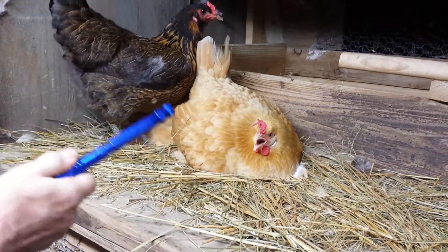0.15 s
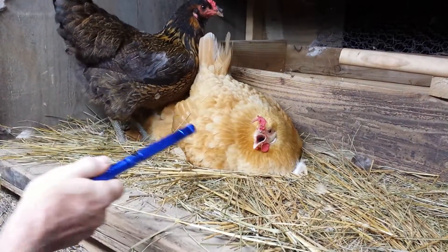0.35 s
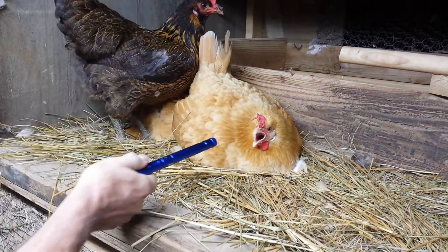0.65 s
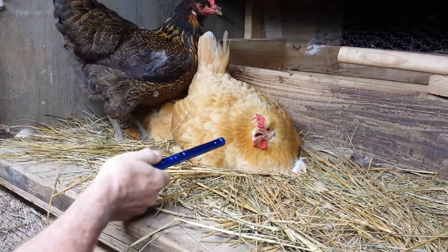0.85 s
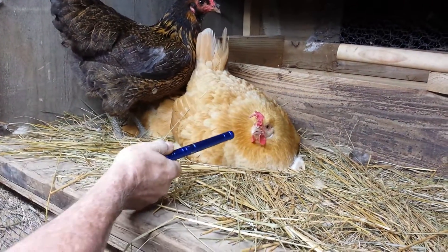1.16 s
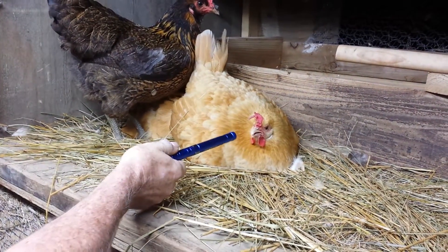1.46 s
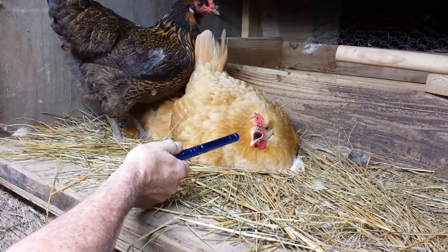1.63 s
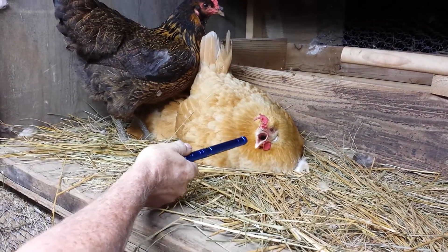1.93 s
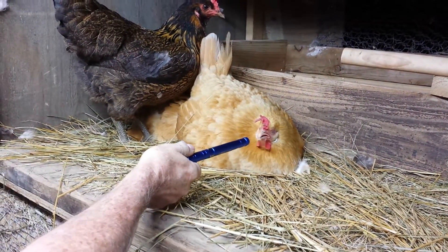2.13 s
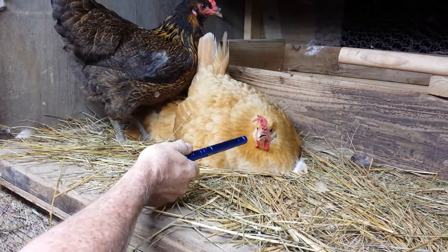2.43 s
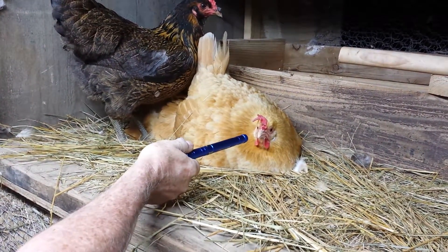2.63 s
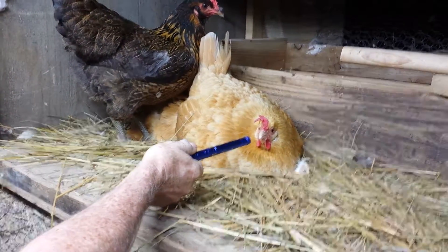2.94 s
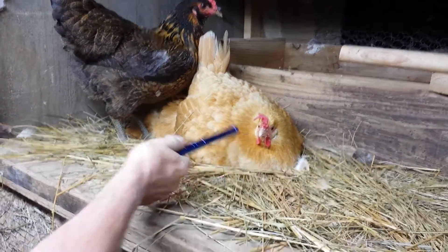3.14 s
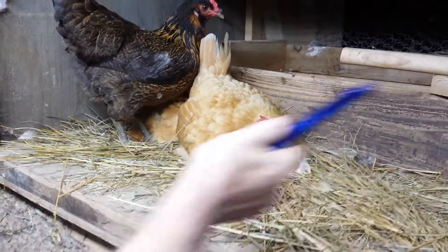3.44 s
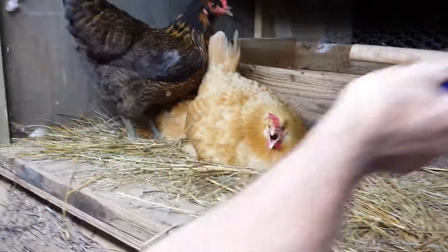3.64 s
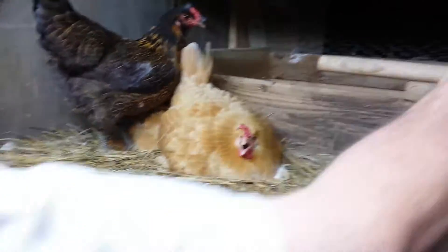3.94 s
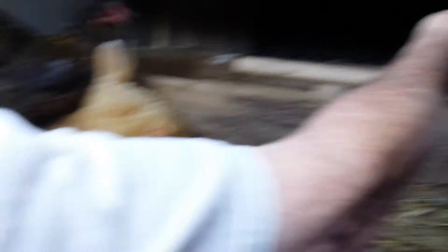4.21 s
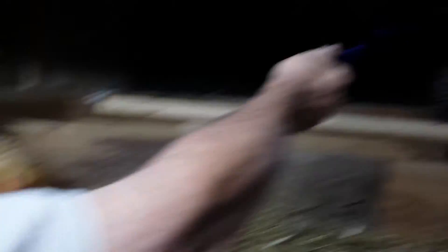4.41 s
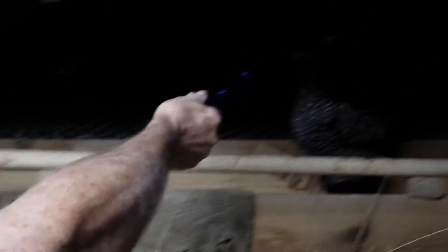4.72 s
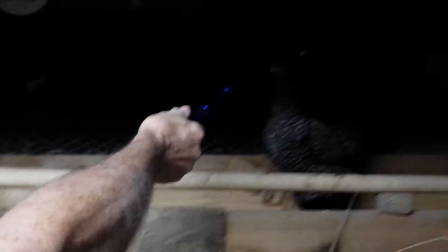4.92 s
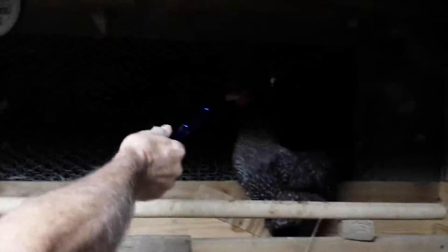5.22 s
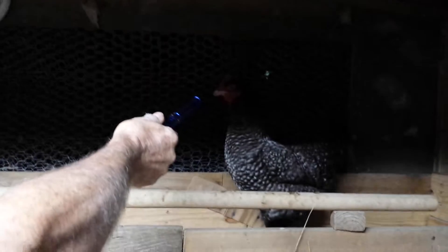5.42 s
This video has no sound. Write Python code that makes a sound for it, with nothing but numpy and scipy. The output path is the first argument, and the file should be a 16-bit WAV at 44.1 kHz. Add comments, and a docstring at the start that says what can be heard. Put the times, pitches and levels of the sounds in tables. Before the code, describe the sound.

A handheld stereo microphone is close to hens in a wooden nest box, with a brief dull board echo, faint hiss and low hum. The sound opens mid-screech: a loud, high, wavering whistle breaks at about 0.13 s into a harsh throbbing growl. More broken shrieks follow at 0.3-0.5 and 0.6-0.75 s, each falling into growls, with stuttering rasps until about 1.05 s. Soft low clucks from another hen continue about four a second, exposed in the gap. From 1.6 s a screech swells, clears and peaks near 1.9 s, dropping at 2.07 s into a rough squawk and hoarse croak, with broken remnants to 2.55 s. Mostly clucks remain until faint stutters at 3.35-3.6 s. Screeches return at 3.6-3.9 s, then a growl, and a sharp shriek at 4.06-4.25 s. A different hen then gives a long, lower, rasping, wavering complaint to the abrupt end at 5.57 s, amid stronger clucks and slightly louder background air.

```python
"""Hens protesting in a nest box

One hen in a wooden nest box screeches in a high whistling register, drops into a harsh growl and stutters;
her screech is a few wavering tones, her growls and squawk are rough pulses coloured by a throat.
A second hen makes a long drawn-out complaint and a third clucks about four times a second, with the same
kind of pulses. The boards of the coop add a short tail of filtered noise over faint hiss and a low hum."""
import sys
import numpy as np
from scipy import signal
from scipy.fft import rfft, irfft, next_fast_len
from scipy.io import wavfile
from scipy.ndimage import uniform_filter1d

SR = 44100
rng = np.random.default_rng(int(sys.argv[2]) if len(sys.argv) > 2 else 0)


def output_pcm(signal):
    """Save a mono or channel-first signal as 16-bit PCM at the path in sys.argv[1].

    Samples are clipped to [-1, 1] before scaling.
    """
    pcm = np.clip(np.atleast_2d(signal).T, -1, 1) * 32767
    wavfile.write(sys.argv[1], SR, np.round(pcm).astype(np.int16))


def undo_db(level):
    """Turn decibels back into plain size, where 20 dB means ten times bigger."""
    steps = np.asarray(level, float) / 20
    return 10 ** steps


N = 245637
TIME = np.arange(N) / SR

# The throat behind growls, short bursts and croak. Each row: frequency in Hz, relative strength in dB.
GROWL_THROAT = [(400, -29), (720, -10.5), (940, -2), (1250, -1), (1500, -10.5), (1900, -11), (2800, -14),
                (3800, -12.5), (4700, -17), (5700, -11.5), (6500, -22), (7500, -19.5), (9500, -32.5),
                (11500, -53), (14400, -52)]
# Stretches in which the vocal folds settle into a steadier beat.
# Each row: start in seconds, end in seconds, roughness from 0 to 1.
CLEAR_STRETCHES = [(2.15, 2.3, .07), (4.35, 4.42, .2), (4.79, 4.87, .24), (4.92, 5.075, .13),
                   (5.18, 5.235, .14), (5.285, 5.385, .2)]


def level(x, db):
    """Scale a sound to an average (rms) level in dB."""
    return x * undo_db(db) / np.sqrt(np.mean(x ** 2) + 1e-18)


def along(table, hz):
    """Read a table of (Hz, value) rows between its points, on a log-frequency axis."""
    table_hz, values = np.transpose(table)
    return np.interp(np.log(hz + 1), np.log(table_hz + 1), values)


def colour(x, table):
    """Make frequencies stronger or weaker by a table of (Hz, dB) rows."""
    count = x.shape[-1]
    size = next_fast_len(count + 2048)
    hz = np.arange(size // 2 + 1) * SR / size
    return irfft(rfft(x, size) * undo_db(along(table, hz)), size)[..., :count]


def walk(count, rate):
    """Smooth random wandering that changes about rate times a second, with spread 1."""
    k = max(int(SR / rate), 1)
    noise = rng.standard_normal(count + 2 * k)
    smooth = uniform_filter1d(uniform_filter1d(noise, k), k)[k:k + count]
    return smooth * np.sqrt(1.5 * k)  # makes up for the spread lost in smoothing


def add(out, start_s, x):
    """Mix x into out from a moment on."""
    i = int(start_s * SR)
    out[i:i + len(x)] += x[:N - i]


def spread(table):
    """Join the rows of a call sample by sample, with a short fade at both ends."""
    s, *columns = np.transpose(table)
    t = np.arange(s[0], s[-1], 1 / SR)
    since_start = t - s[0] + 0.0025 * (s[0] == 0)  # a call at time zero is already under way
    fade = np.clip(np.minimum(since_start, s[-1] - t) / 0.0053, 0, 1)
    return t, fade, [np.interp(t, s, column) for column in columns]


def air():
    """Faint hiss and rumble with a wavering low hum; the bass is alike left and right."""
    # Each row: frequency in Hz, relative noise density in dB.
    air_colour = [(15, -37.5), (25, -5.5), (97, -11.5), (137, -14.5), (170, -29.5), (240, -15.5),
                  (1040, -25.5), (2430, -34), (8470, -31.5), (9420, -38), (14400, -44)]
    # Each row: time in seconds, level in dB.
    air_level = [(0, -51.5), (1.2, -51.5), (2.5, -55), (3.3, -52.5), (3.65, -44), (5.57, -45)]
    # Each row: frequency in Hz, usual level in dB against the air level.
    hum_tones = [(88, -10), (110, -14.5)]
    mid, side = colour(rng.standard_normal((2, N)), air_colour)
    side = signal.lfilter(*signal.butter(1, 90, "high", fs=SR), side)
    hum = np.zeros(N)
    for hz, db in hum_tones:
        strength = np.sqrt(2) * undo_db(db + 3.5 * walk(N, 3.36))
        hum += strength * np.sin(2 * np.pi * hz * TIME + 2.2 * walk(N, 3.8))
    hiss = level(mid + 0.72 * side * np.array([[1], [-1]]), -3.4)
    return (hiss + hum) * undo_db(np.interp(TIME, *np.transpose(air_level)))


def screech():
    """Few strong partials that waver and slip, with half-pitch lines and a rasp between them."""
    # One list a call. Each row: time in seconds, pitch in Hz, level in dB,
    # strain in dB (half-pitch lines and rasp against the level).
    calls = [
        [(0, 1697, -14, -14), (.035, 1717, -15, -21.5), (.08, 1708, -14.5, -20.5), (.115, 1658, -13.5, -23),
         (.125, 1496, -34, 6.5), (.138, 1302, -13.5, -15.5)],
        [(.29, 1506, -22.5, -9), (.302, 1329, -31.5, 2), (.325, 1351, -22, -15.5), (.35, 1414, -33, 7.5),
         (.362, 1725, -16, -15.5), (.445, 1628, -16.5, -11.5), (.452, 1495, -22, -9.5), (.485, 1447, -22, -7.5),
         (.495, 1275, -27.5, -2), (.512, 1247, -25.5, -7)],
        [(.6, 1268, -20, -5), (.64, 1410, -24.5, -18.5), (.655, 1614, -19.5, -1), (.67, 1390, -21.5, -11),
         (.715, 1453, -18.5, -33), (.724, 1326, -21, -3), (.755, 1283, -28.5, -1.5)],
        [(1.58, 1123, -66, -10), (1.602, 1232, -37.5, -17), (1.655, 1278, -47, 10), (1.697, 1667, -27.5, -26.5),
         (1.81, 1657, -21.5, -36.5), (1.88, 1737, -16, -42.5), (1.93, 1721, -14.5, -34),
         (1.995, 1604, -20, -17.5), (2.005, 1455, -20, -9), (2.045, 1308, -26.5, -23), (2.07, 1295, -22, -7.5)],
        [(3.6, 1416, -40.5, 1), (3.65, 1500, -36, -5.5), (3.722, 1658, -25, -8), (3.745, 1544, -25, -21.5),
         (3.795, 1670, -17, -55), (3.815, 1543, -25.5, -14), (3.845, 1453, -25, -15.5),
         (3.855, 1373, -29.5, 2.5), (3.892, 1280, -18.5, -7.5)],
        [(4.06, 1319, -20.5, -41.5), (4.095, 1407, -27.5, -4.5), (4.101, 1477, -20.5, -22),
         (4.132, 1672, -11, -28.5), (4.16, 1609, -18.5, -23), (4.167, 1488, -18.5, -32.5),
         (4.19, 1470, -18, -19), (4.198, 1387, -21, -21), (4.25, 1274, -17, -19)],
    ]
    # One row a call: first partial in dB (a wider beak thins it), partials above the second in dB,
    # half-pitch lines in dB against the rasp.
    voices = [(3, 0, 3.5), (0.5, -0.5, -20), (-3.5, -1, -10.5), (-7.5, 1, -11), (-11, 0, -6),
              (-13, -8.5, -14)]
    # The half-pitch lines from the lowest up, each in dB.
    half_lines_db = [-23, -9, -20.5, -5.5, -20.5]
    # The throat that the partials move through. Each row: frequency in Hz, strength in dB.
    screech_throat = [(1200, 7.5), (1700, -9), (2600, 8.5), (3000, 2), (3400, -6.5), (4000, -3.5),
                      (5000, -7.5), (6600, -16), (8300, -22), (10000, -49.5), (13500, -47)]
    # Each row: frequency in Hz, relative strength of the rasp in dB.
    rasp_colour = [(500, -18.5), (1000, -9.5), (3000, -11), (5500, -3.5), (8500, -9), (11000, -45),
                   (14400, -41.5)]
    # Brief breaks of the pitch. Each row: time in seconds, pitch change as a share.
    slips = [(.054, -0.082), (0.095, -0.1), (.337, 0.12), (0.417, -.11), (0.459, -0.094), (1.823, -0.0022),
             (2.033, .07), (3.871, 0.053)]
    slip_s = 0.0039
    strain_waver = 1.5  # how much more the pitch wavers under full strain

    out = np.zeros(N)
    slip = sum(share * np.exp(-.5 * ((TIME - s) / slip_s) ** 2) for s, share in slips)
    for table, (first_db, upper_db, half_db) in zip(calls, voices):
        t, fade, (hz, db, strain_db) = spread(table)
        count = len(t)
        waver = .011 * walk(count, 110) + 0.0097 * walk(count, 300)
        waver = waver * (1 + strain_waver * np.minimum(undo_db(strain_db), 1))
        phase = 2 * np.pi * np.cumsum(hz * (1 + np.interp(t, TIME, slip) + waver)) / SR
        partials = []
        for k in range(1, 9):
            throat_db = along(screech_throat, k * hz)
            partials.append((k, throat_db + first_db * (k == 1) + upper_db * (k > 2)))
        for k, line_db in enumerate(half_lines_db):
            partials.append((k + .5, strain_db + half_db + line_db))
        tone = np.zeros(count)
        for k, part_db in partials:
            flicker_db = 1.34 * walk(count, 110)
            tone += np.sqrt(2) * undo_db(part_db + flicker_db) * np.sin(k * phase)
        puffs = rng.standard_normal(count) * (1 + 0.52 * np.cos(phase))
        rasp = level(colour(puffs, rasp_colour), 0) * undo_db(strain_db)
        add(out, t[0], fade * undo_db(db) * (tone + rasp))
    return out


def folds(hz, rough, throat, jitter, throb_db, breath_db):
    """Vocal-fold pulses through a throat; roughness shakes pitch and strength and lets air hiss through."""
    # Each row: frequency in Hz, relative hiss in dB; it is weakest near the usual fundamental.
    breath_colour = [(500, -3), (900, -9), (1300, -5), (2200, 0), (14000, 0)]
    count = len(hz)
    shake = 0.00405 * walk(count, 59.4) + jitter * rough * walk(count, 324)
    phase = 2 * np.pi * np.cumsum(hz * (1 + shake)) / SR
    pulses = np.zeros(count)
    for k in range(1, 41):
        # the moving beak lets every partial swell and fade on its own
        strength = undo_db(min(1.5 * k, 3) * walk(count, 20))
        pulses += strength * np.cos(k * phase + .3 * k * k) * (k * hz < 15000)
    breath = colour(rng.standard_normal(count) * (1 + .9 * np.cos(phase)), breath_colour)
    source = np.sqrt(1 - .5 * rough) * level(pulses, 0) + rough * level(breath, breath_db)
    dips_db = throb_db * rough * np.abs(walk(count, 85)) ** 1.5
    return level(colour(source, throat), 0) * undo_db(-dips_db)


def chest(x, db):
    """The lowest throat resonance opens and closes against the rest."""
    low = signal.sosfiltfilt(signal.butter(2, 1350, fs=SR, output="sos"), x)
    return x + (undo_db(db) - 1) * low


def clucks():
    """Each cluck rises to its top pitch and sags again while it swells and dies."""
    # Each row: start in seconds, strength in dB before the beak opens, top pitch in Hz, length in seconds.
    cluck_list = [(0.108, -18, 316, 0.057), (0.339, -16.5, 317.6, .055), (0.613, -18.5, 306.6, 0.046),
                  (0.855, -18, 320, 0.067), (1.076, -10, 315, 0.044), (1.296, -17, 328.7, 0.0476),
                  (1.523, -17.5, 316.4, 0.04), (1.731, -14, 329.7, 0.065), (1.949, -13.5, 335, 0.044),
                  (2.482, -14.5, 413.5, .065), (2.714, -15, 371.4, 0.049), (2.957, -18.5, 342.6, .055),
                  (3.271, -19, 304.6, 0.054), (3.589, -12.5, 329.2, 0.049), (3.799, -10.5, 314.7, 0.049),
                  (4.028, -11.5, 349.4, 0.045), (4.24, -13, 317.5, 0.071), (4.488, -9.5, 384.5, .05),
                  (4.716, -8, 390.7, 0.062), (4.957, -6.5, 344.5, 0.048), (5.21, -8.5, 377, 0.044),
                  (5.479, -12.5, 363.6, 0.054)]
    # Each row: frequency in Hz, relative strength in dB.
    cluck_throat = [(130, -36), (220, -2.5), (320, -6), (480, -23), (700, 2.5), (1050, 3.5), (1450, -13),
                    (1950, -19), (2400, -31.5), (3700, -19), (5000, -28.5), (7500, -28), (9500, -35),
                    (11000, -57), (14000, -49)]
    out = np.zeros(N)
    for s, db, hz, length in cluck_list:
        u = np.arange(int(length * SR)) / (length * SR)  # 0 to 1 through the cluck
        arch = np.interp(u, [0, .35, .55, .75, 1], [.74, .96, 1, .97, .86])
        voice = folds(hz * arch, .75 + 0 * u, cluck_throat, jitter=.05, throb_db=3, breath_db=2)
        # a harder cluck opens the beak: the fundamental falls behind
        low = signal.sosfiltfilt(signal.butter(2, 480, fs=SR, output="sos"), voice)
        voice = voice + (undo_db(-.9 * (db + 23.0)) - 1) * low
        swell = np.interp(u, [0, .1, .3, .55, .8, 1], [0, .35, .7, 1, .5, 0])
        add(out, s, undo_db(db) * swell * voice)
    return out


def low_voice(tables, throat, harsh, clear, throb_db, chest_db):
    """Growls, croak, squawk and complaint share one mechanism: harsh, but for their clear stretches."""
    settle_s = .025
    out = np.zeros(N)
    for table in tables:
        t, fade, (hz, db) = spread(table)
        rough = np.full(len(t), float(harsh))
        for start, end, clear_rough in clear:
            settled = np.clip(np.minimum(t - start, end - t) / settle_s + 1, 0, 1)
            rough -= (harsh - clear_rough) * settled
        rough = np.clip(rough, .03, 1)
        voice = folds(hz, rough, throat, jitter=.048, throb_db=throb_db, breath_db=2)
        add(out, t[0], fade * undo_db(db) * chest(voice, chest_db))
    return out


def growls():
    """Each growl holds its level while the pitch sags through its mean, then lets go; it throbs unevenly."""
    # Each row: start in seconds, length in seconds, level in dB before the chest lift, mean pitch in Hz.
    growl_list = [(.135, 0.17, -19, 930), (0.513, 0.12, -16.5, 944), (.752, .14, -17.5, 938),
                  (3.891, 0.19, -20.5, 930)]
    sag_hz_per_s, release_s, release_db = 150, 0.038, -12.5
    throb_hz, throb_depth = 40, .45
    tables = []
    for s, length, db, hz in growl_list:
        rows = []
        for moment, drop_db in [(s, 0), (s + length - release_s, 0), (s + length, release_db)]:
            rows.append((moment, hz - sag_hz_per_s * (moment - s - length / 2), db + drop_db))
        tables.append(rows)
    uneven_hz = throb_hz * (1 + .2 * walk(N, 25))
    throb = 1 + throb_depth * np.sin(2 * np.pi * np.cumsum(uneven_hz) / SR)
    return throb * low_voice(tables, GROWL_THROAT, .7, [], throb_db=2.5, chest_db=4.5)


def short_bursts():
    """Short growl-voiced bursts: stutters, accents inside the growls and one faint tick.

    Weak bursts come through a closing beak, with more chest."""
    # Each row: start in seconds, peak strength in dB before the chest lift, length in seconds,
    # swell (share of the length up to the peak, kept within .07 to .85).
    bursts = [(0.137, -13, 0.029, 0.34), (0.508, -11, 0.032, 0.25), (0.7588, -9, 0.0078, .3),
              (0.7974, -9.5, 0.016, 0.12), (0.855, -15.5, 0.044, 0.24), (0.902, -16, 0.042, .55),
              (0.958, -18, 0.04, 0.48), (1.026, -25.5, 0.024, 0.26), (1.514, -43.5, 0.025, .1),
              (2.357, -27, 0.025, 0.96), (2.415, -28.5, 0.024, 0.43), (2.473, -32.5, 0.028, .4),
              (3.352, -43.5, .021, .2), (3.399, -36.5, 0.034, 0.84), (3.467, -28, 0.018, 0.12),
              (3.51, -23, 0.02, 0.051), (3.556, -22.5, 0.026, 0.061), (3.898, -14, 0.014, 0.47)]
    pitch_hz = 892
    open_beak_db, closed_chest_db = -9.5, 15  # below the first the chest takes over, up to the second
    out = np.zeros(N)
    for s, db, length, swell in bursts:
        u = np.arange(int(length * SR)) / (length * SR)  # 0 to 1 through the burst
        falling_hz = pitch_hz * (1.05 - .12 * u)
        voice = folds(falling_hz, .9 + 0 * u, GROWL_THROAT, jitter=.08, throb_db=2, breath_db=3)
        shape = np.interp(u, [0, .06, np.clip(swell, .07, .85), .9, 1], [0, .4, 1, .35, 0])
        add(out, s, undo_db(db) * shape * chest(voice, min(open_beak_db - db, closed_chest_db)))
    return out


def croak():
    """A hoarse croak under the squawk and its broken tail: very rough pulses through the growl's throat."""
    # Each row: time in seconds, pitch in Hz, level in dB before the chest lift.
    croak_path = [(2.07, 902, -16.5), (2.13, 923, -26), (2.27, 1051, -37.5), (2.33, 906, -20.5),
                  (2.43, 832, -47), (2.56, 812, -28)]
    return low_voice([croak_path], GROWL_THROAT, .9, [], throb_db=6, chest_db=5.5)


def squawk():
    """A lower call with harsh edges: the folds beat slower and run clear in the middle."""
    # Each row: time in seconds, pitch in Hz, level in dB before the chest cut.
    squawk_path = [(2.07, 501, -21), (2.15, 535, -14), (2.19, 523.7, -14.5), (2.222, 517.6, -13),
                   (2.26, 530.3, -16), (2.3, 529.6, -16), (2.318, 517, -18), (2.335, 510, -41)]
    # Each row: frequency in Hz, relative strength in dB.
    squawk_throat = [(300, -55), (525, -24), (1050, -19), (1575, -17), (2100, -11.5), (3150, -17.5),
                     (3675, -37), (4200, -11), (4725, -25), (5250, -6), (5775, -12.5), (6500, -18),
                     (10000, -31.5), (12500, -42.5), (14400, -41.5)]
    return low_voice([squawk_path], squawk_throat, .75, CLEAR_STRETCHES, throb_db=6, chest_db=-9)


def complaint():
    """A long drawn-out call of wandering pitch, its rough pulses clearing for moments."""
    # Each row: time in seconds, pitch in Hz, level in dB before the chest lift.
    complaint_path = [(4.25, 500.2, -22), (4.33, 497.8, -15), (4.344, 473.3, -18), (4.544, 492.4, -17.5),
                      (4.566, 431, -17), (4.594, 425.9, -17.5), (4.778, 461.6, -20), (4.856, 429.7, -17.5),
                      (4.882, 459.1, -20.5), (5.092, 485.5, -18.5), (5.228, 482, -18.5),
                      (5.3, 438.2, -15.5), (5.386, 446.1, -17), (5.43, 490.8, -16.5), (5.474, 450.2, -16),
                      (5.57, 451.3, -16)]
    # Each row: frequency in Hz, relative strength in dB.
    complaint_throat = [(240, -26), (470, -21), (930, -0.5), (1400, -16.5), (1780, -1.5), (2000, -4),
                        (2400, -2), (3200, -10), (3700, -2.5), (4800, -14), (5780, -3), (6320, -12.5),
                        (7230, -8.5), (8500, -23), (12200, -45), (14400, -42)]
    return low_voice([complaint_path], complaint_throat, .66, CLEAR_STRETCHES, throb_db=5.5, chest_db=6.0)


def ports(x, balance, phase):
    """Level and phase difference between the left and right microphone port, half on each side."""
    size = next_fast_len(N + 2048)
    hz = np.arange(size // 2 + 1) * SR / size
    half = undo_db(along(balance, hz) / 2) * np.exp(.5j * np.interp(hz, *np.transpose(phase)))
    return irfft(rfft(x, size) * np.array([half, 1 / half]), size)[:, :N]


def coop(x):
    """Dense reflections from the boards, duller than the direct sound, different at each port."""
    t60_s, bottom_hz, top_hz, tail_db = 0.19, 450, 5060, -10.5  # t60: time to fade by 60 dB
    t = np.arange(int(.5 * SR)) / SR
    tail = rng.standard_normal((2, len(t))) * undo_db(-60 * t / t60_s) * np.clip(t / 0.0022, 0, 1)
    tail = signal.lfilter(*signal.butter(1, [bottom_hz, top_hz], "band", fs=SR), tail)
    tail = tail / np.sqrt(np.sum(tail ** 2) / 2) * undo_db(tail_db)
    return signal.fftconvolve(x[None], tail, axes=1)[:, :N]


def scene():
    """Three hens at their places, the coop around them and the air."""
    # How each hen reaches the two ports.
    # Balance, each row: frequency in Hz, left minus right in dB.
    # Phase, each row: frequency in Hz, lead of the left port in radians.
    nest_balance = [(60, 3), (110, -2.5), (200, -0.5), (370, 2.5), (680, 2), (1240, -1), (2270, -1.5),
                    (4160, 10.5), (7620, -12.5), (14000, -18)]
    nest_phase = [(0, 0), (1120, 0.2), (1380, -2.0), (3100, 5.3), (3620, 12.5), (4050, 10.6), (4740, 13.4),
                  (6370, 12.1), (7060, 14.2), (8180, 11.9), (8870, 13.6), (9820, 11.7), (11200, 12.7),
                  (14100, 12.7)]
    perch_balance = [(60, 10), (110, -9), (200, -7), (370, 8), (680, -2), (1240, 5.5), (2270, -8.5),
                     (4160, 11), (7620, -10), (14000, -26)]
    perch_phase = [(0, 0), (690, -0.5), (1120, -1.3), (1720, -6.6), (2330, -3.3), (3880, -8.6),
                   (4480, -8.6), (5510, -3.8), (6630, -4.1), (8010, -5.6), (9730, -2.2), (11500, -3.8),
                   (12800, 2.7), (14100, 3.5)]
    cluck_balance = [(60, 0.0), (110, 0.5), (200, 0.0), (370, -0.5), (680, 2.5), (1240, -0.5), (2270, 2.5),
                     (4160, 3.5), (7620, -3.5), (14000, -3.5)]
    cluck_phase = [(0, 0), (2500, 6.0), (3620, 1.1), (5340, 14.7), (6030, 18.0), (7410, 20.1), (8700, 25.8),
                   (9560, 20.9), (10600, 31.6), (11200, 28.4), (12600, 38.0), (13000, 36.2), (13600, 46.6),
                   (14100, 49.9)]
    nest = screech() + growls() + short_bursts() + croak() + squawk()
    perch = complaint()
    clucker = clucks()
    direct = ports(nest, nest_balance, nest_phase) + ports(perch, perch_balance, perch_phase)
    # once the phone has swung round, the clucks arrive from the same side as the complaint
    turned = np.clip((TIME - 4.15) / .08, 0, 1)
    direct = direct + ports(clucker * (1 - turned), cluck_balance, cluck_phase)
    direct = direct + ports(clucker * turned, perch_balance, perch_phase)
    return direct + coop(nest + perch + undo_db(2.5) * clucker) + air()


def band_limit(x):
    """A steep low-pass at the top of the band."""
    return signal.sosfilt(signal.butter(12, 14570, fs=SR, output="sos"), x)


def record(dry):
    """The microphone drops deep bass; a steep band limit, gain control on loud calls and peak rounding follow."""
    band = signal.sosfilt(signal.butter(3, 58, "high", fs=SR, output="sos"), dry)
    band = signal.sosfilt(signal.ellip(10, .2, 85, 14400, fs=SR, output="sos"), band)  # steep top limit
    loudness = np.sqrt(uniform_filter1d(np.mean(band ** 2, axis=0), size=600) + 1e-12)
    band = band * np.minimum(1, undo_db(-13) / loudness) ** .45  # acts above -13 dB
    rounded = np.tanh(0.84 * band) / 0.76
    return band_limit(rounded)


dry = scene()
out = record(dry)
output_pcm(out)
```